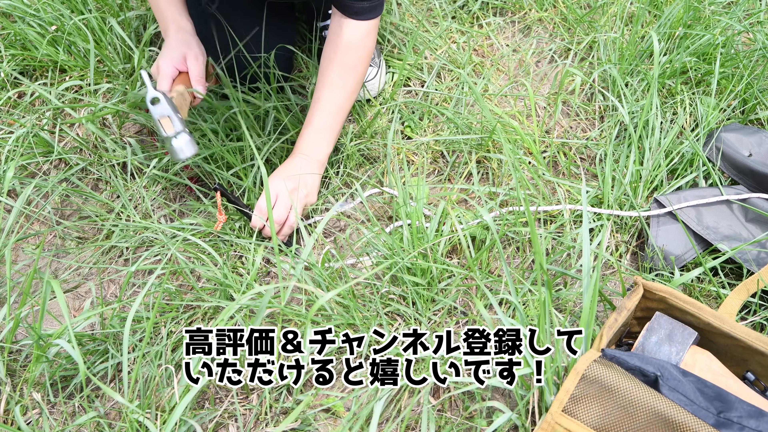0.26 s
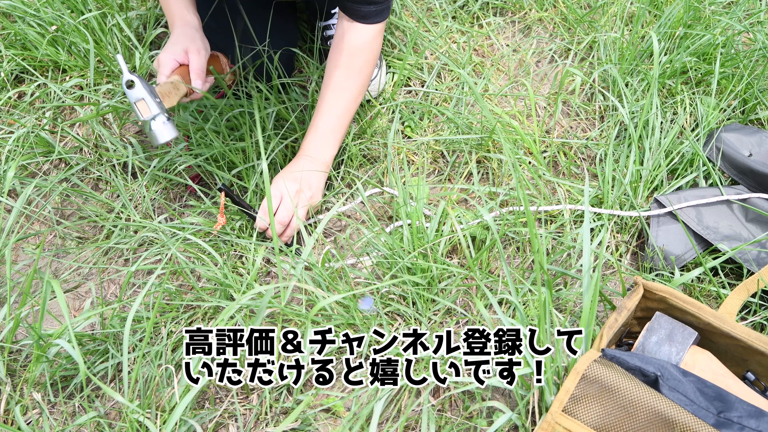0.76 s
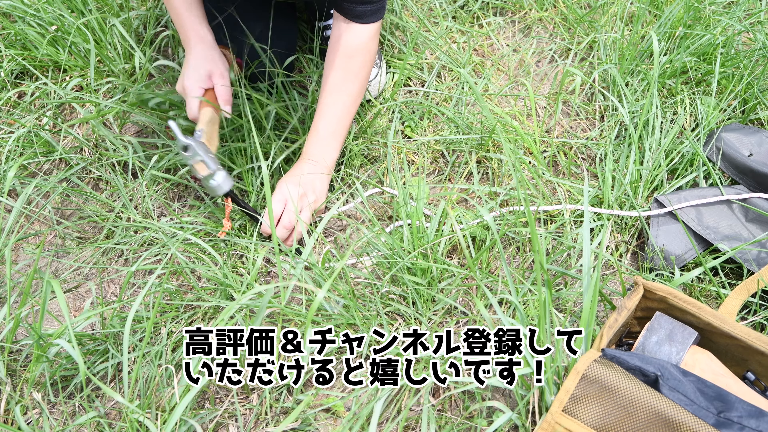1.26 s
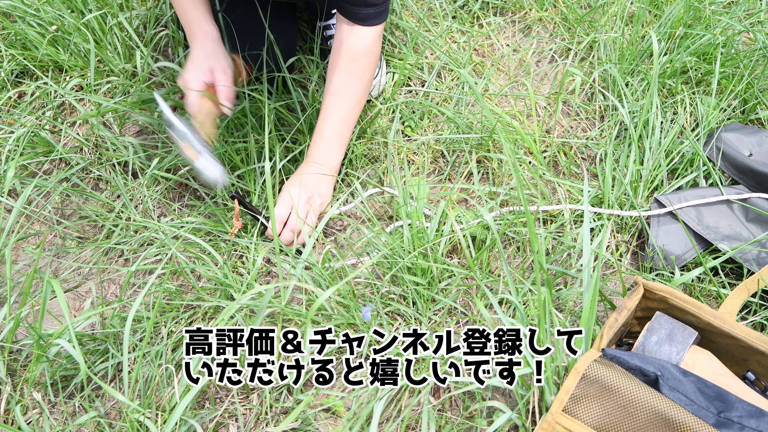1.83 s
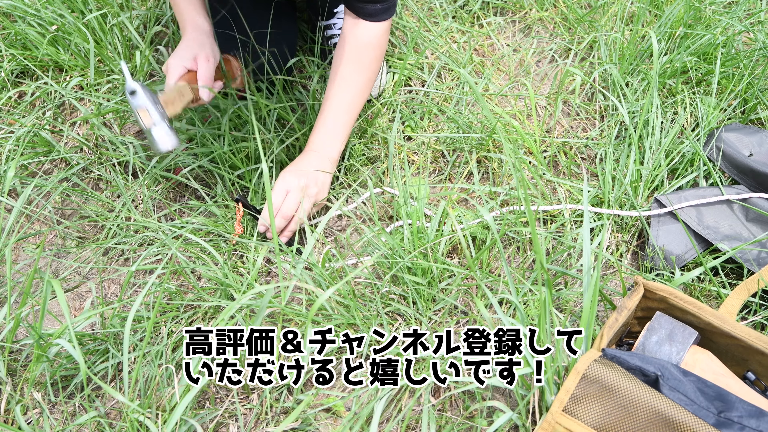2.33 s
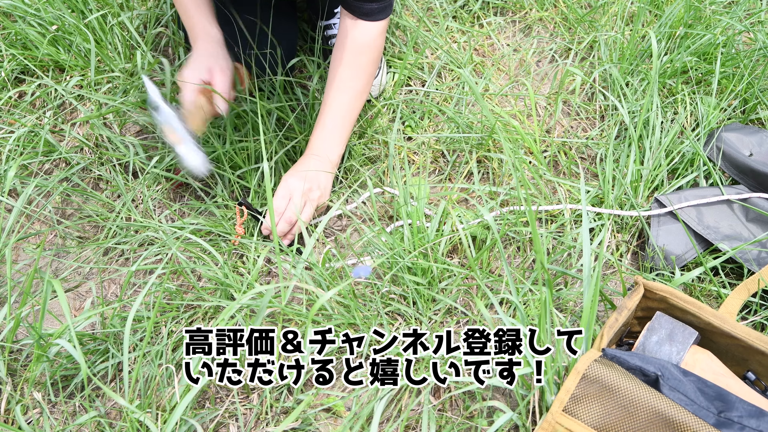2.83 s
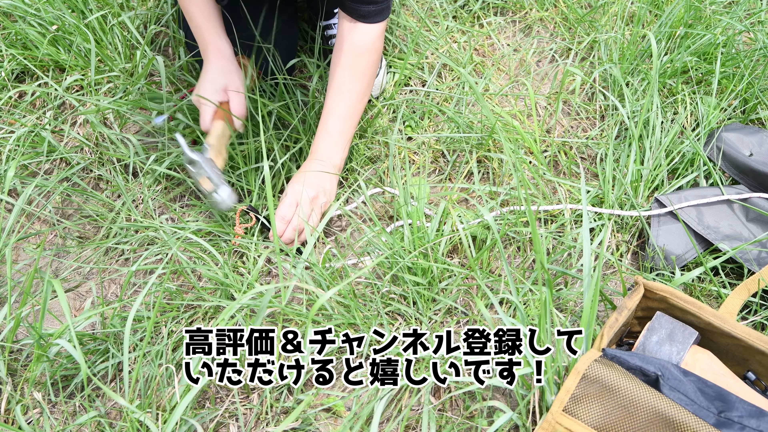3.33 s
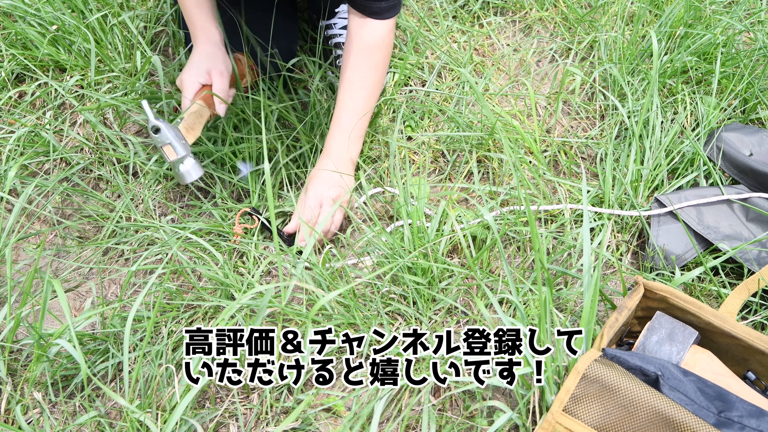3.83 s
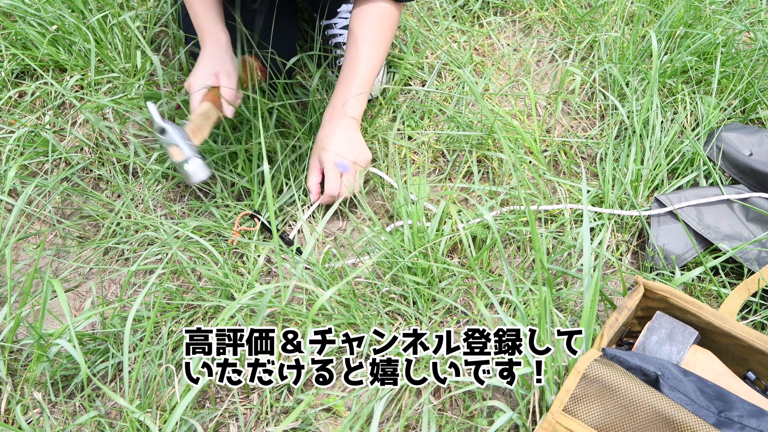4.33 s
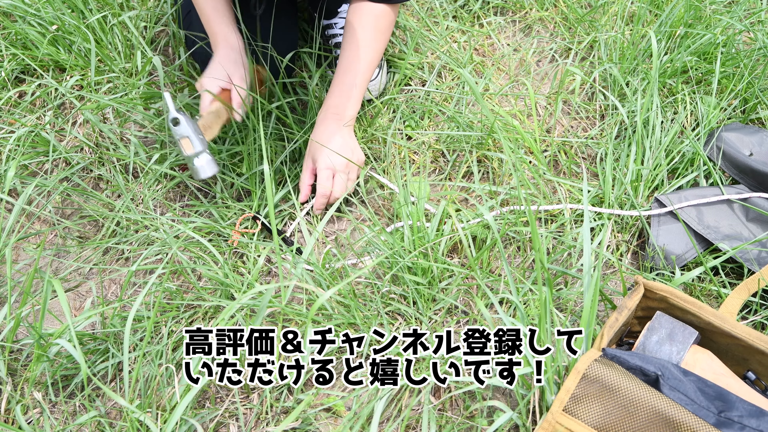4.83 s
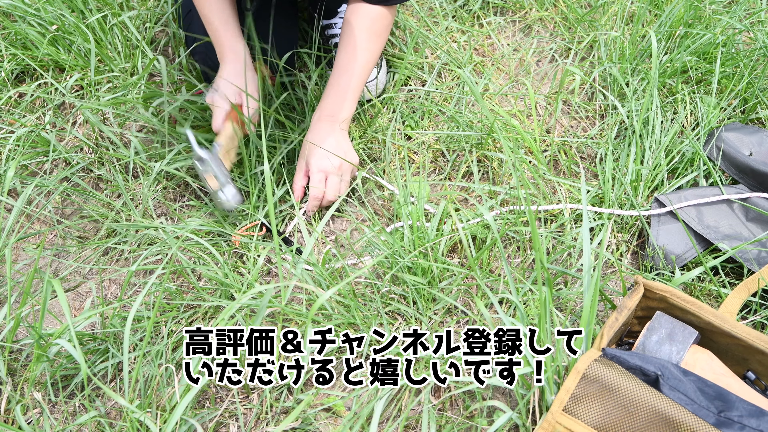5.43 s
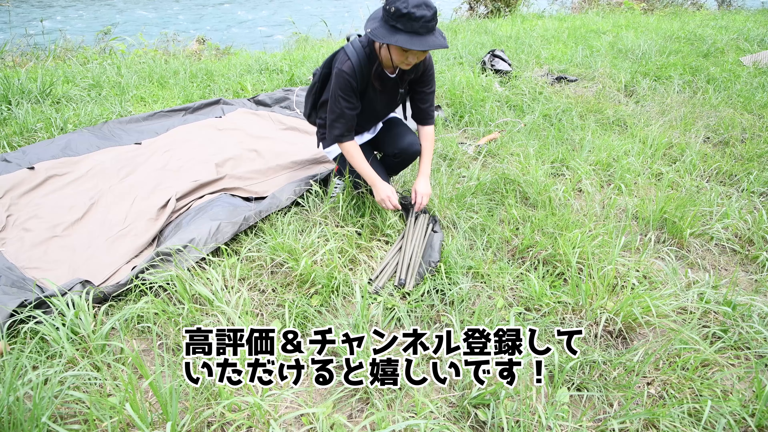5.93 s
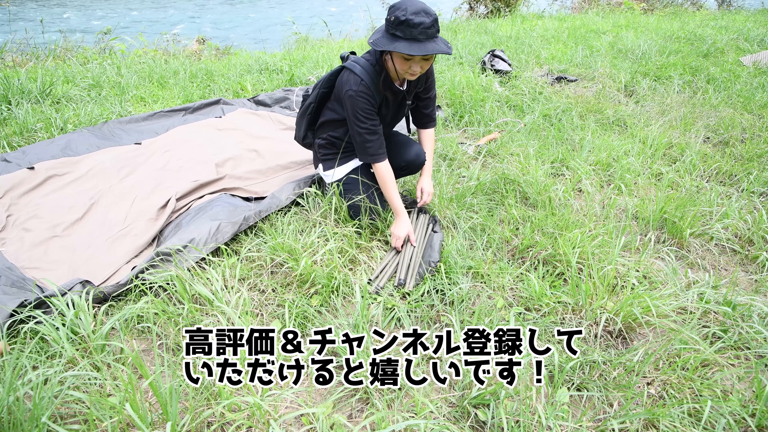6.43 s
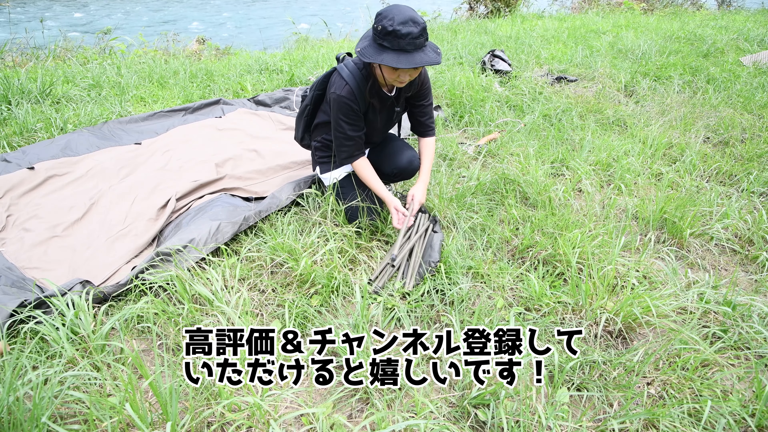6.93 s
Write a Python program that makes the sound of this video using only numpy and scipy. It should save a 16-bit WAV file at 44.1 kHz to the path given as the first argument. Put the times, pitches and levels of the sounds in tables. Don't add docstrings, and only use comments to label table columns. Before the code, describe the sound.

Quiet riverbank air opens the scene: smooth water hiss, a faint low generator hum and a thin high insect blur. From 0.66 s a small hammer taps a steel peg, the first blow weaker, then blows at about 1.0, 1.4, 1.7 and 2.0 s. Each is loud, close, dry and bright, a crack with milliseconds of ring and grassy grit, often followed by a tiny rebound. After a short pause and a faint grass brush, firmer taps come at 2.6, 3.0, 3.3 and 3.7 s. Another pause, then five from 4.3 to 5.8 s, some brighter, with more handle knock and soft soil thumps. At 6.0 s the ambience cuts to a wider spot: low rumble gives way to a beating motor drone, insects slightly louder, a soft brush near 6.2 s. Bundled poles clack softly at 6.66 s, then more strongly in a quick double at 6.97 s.

```python
import sys
import numpy as np
from scipy import signal
from scipy.fft import rfft, irfft, next_fast_len
from scipy.io import wavfile
from scipy.ndimage import uniform_filter1d

SR = 44100
rng = np.random.default_rng(int(sys.argv[2]) if len(sys.argv) > 2 else 0)


def persist_wave(psi):
    counts = np.round(np.clip(psi, -1, 1) * 32767).astype(np.int16)
    wavfile.write(sys.argv[1], SR, np.atleast_2d(counts).T)


def ratio_of_db(decibels):
    return 10 ** (np.asarray(decibels, float) / 20)


N = 316364
CLOCK = np.arange(N) / SR
CHANGE_S = 6.0

# start in seconds, strength in dB, pitch of the peg in Hz,
# brightness above that pitch in dB per octave, delay of the second touch in ms.
BLOWS = [(0.6602, -9, 6840, 0, 0.18), (1.0277, -1.8, 6540, -2, 0.61), (1.3564, 2.5, 6770, 0, 0.18),
         (1.6631, 1.4, 6840, 0, 0.69), (1.983, 1.2, 7740, -2.8, 0.33), (2.6324, -.2, 7560, 6, 0.28),
         (3.0008, -0.1, 7280, 0, 0.36), (3.3474, 0.1, 6900, 2.5, 0.36), (3.6923, 1.6, 8740, -2.5, 0.4),
         (4.2712, -1.3, 8600, 9.5, .345), (4.6423, -0.7, 6690, 3.5, 0.24), (5.033, 0, 8930, 8, 0.29),
         (5.4062, 0.8, 6720, 1.7, 0.25), (5.7833, 0.5, 9330, -4.5, 0.29)]
# start in seconds, level in dB.
BOUNCES = [(1.0484, -57), (1.373, -49), (1.6934, -47), (2.0044, -48), (2.649, -45), (3.3718, -44),
           (3.719, -39.5), (4.2854, -51), (4.6704, -45), (5.051, -41), (5.4226, -47), (5.803, -44)]
# start in seconds, handle knock in dB,
# left minus right in dB.
BOUTS = [
    (0, -2, 2.0),
    (2.3, 1, 3.6),
    (4.0, 4, 1.2),
]
# low, middle and main peg ring, two high head rings,
# two weaker rings, all in Hz.
RINGS_HZ = [
    (3350, 4790, 7000, 10730, 14880, 5640, 11810),
    (3730, 5720, 7200, 10150, 15580, 6580, 13300),
    (3480, 4450, 8000, 10130, 14360, 5930, 11600),
]
RINGS_DB = [
    (2.8, 7, 11.9, 5.7, 1, 1.5, .6),
    (4.4, 13.6, 15.4, 8, 9.1, 9.5, 2.4),
    (-0.5, 6.8, 10.3, 9.4, -0.5, 5.3, 6.1),
]
RING_T60_S = (.0052, .0031, .0037, .0042, .0045, .0037, .0043)
PORT_LEAD_RAD = (.25, .35, .45, .7, 1.1, .4, .9)
FOLLOW = (.17, .69, 1, 0, 0, 0, .13)
# delay in ms, level in dB.
ECHOES = [
    (.33, -3),
    (.6, -15),
]
# centre of the lobe in seconds, level in dB, length in ms, push 1 or pull -1.
THUDS = [(3.704, -45, 2.9, 1), (4.28, -45, 3, 1), (4.471, -42.5, 2.4, -1), (4.651, -45.5, 2.1, 1),
         (4.812, -40.5, 2.2, 1), (5.044, -49, 3, 1), (5.417, -48, 4, 1), (5.794, -46, 3, 1)]
# start in seconds, level in dB, brightness in dB.
CLACKS = [
    (6.6571, -38, -14),
    (6.9642, -33, -27),
    (6.99, -32.5, -11),
]
# pitch in Hz, level in dB, decay by 60 dB in seconds.
POLE_MODES = [(1450, 5, 0.024), (1724, -9, 0.11), (2224, -11.5, 0.14), (2870, -8.5, 0.057),
              (3704, -13, 0.081), (4360, -13.5, 0.11), (5100, -9.5, 0.047)]
# time in seconds, second order in dB, rumble in dB.
MOTOR = [
    (6.0, -59, -54.5),
    (6.35, -54, -52.5),
    (6.62, -52.5, -59),
    (6.9, -52, -73),
    (7.17, -56, -71),
]
# peak in seconds, level in dB, rise in seconds, fade in dB per second.
RUSTLE = [
    (2.67, -63, .004, 150),
    (6.2, -66, .15, 55),
]
# frequency in Hz, level in dB.
NEAR = [(25, -18), (40, -9), (100, -7.5), (210, -8.5), (320, -9.5), (420, -10.5), (850, -15.5),
        (1150, -13.5), (2200, -18.5), (3000, -23), (4600, -31), (7500, -25), (10700, -35), (15900, -33.5)]
# frequency in Hz, level in dB.
WIDE = [(25, -12), (86, -1), (150, -9), (300, -8), (400, -9), (650, -13.5), (1950, -16.5), (3000, -22.5),
        (5200, -31.5), (7800, -23), (9900, -31.5), (15900, -31.5)]
# frequency in Hz, level in dB.
PORT_SPREAD = [(60, -70), (110, -59), (200, -61), (380, -35.5), (700, -17), (1290, -10.5), (2380, -4.5),
               (4400, 1.5), (8120, 3.5), (15000, -1)]
# frequency in Hz, level in dB.
LEAN = [(60, 0.0), (110, 0.0), (200, 0.0), (380, 0.0), (700, -0.5), (1290, -2.0), (2380, -1), (4400, -1),
        (8120, -3.5), (15000, -2.5)]


def unit(x):
    return x / np.sqrt(np.mean(x ** 2))


def fall(t, t60):
    return np.exp(-np.log(1000) * t / t60)


def filtered(design, x):
    return signal.sosfilt(design, x)


def colour(x, points):
    size = next_fast_len(N)
    hz, db = np.transpose(points)
    bins_hz = np.arange(size // 2 + 1) * SR / size
    gain = ratio_of_db(np.interp(np.log(bins_hz + 1), np.log(hz), db))
    return irfft(rfft(x, size) * gain, size)[..., :N]


def band(lo_hz, hi_hz, channels=1):
    edges = signal.butter(2, [lo_hz, hi_hz], "band", fs=SR, output="sos")
    return unit(filtered(edges, rng.standard_normal((channels, N))))


def curve(s, db):
    return ratio_of_db(np.interp(CLOCK, s, db, -120, -120))


def ring(hz, db, t60, phase, size=1300):
    t = np.arange(size) / SR
    decay = fall(t, np.maximum(t60, 1e-3)[:, None])
    return ratio_of_db(db)[:, None] * decay * np.sin(2 * np.pi * hz[:, None] * t + phase[:, None])


def add(out, s, sound):
    i = int(s * SR)
    out[:, i:i + sound.shape[-1]] += sound[..., :N - i]


def steel_rings(hz, db, pan_db, chance):
    start = .12 * chance[:7]
    hz, level_db, t60 = np.array(hz), np.array(db) - 22.5, np.array(RING_T60_S)
    lead = np.array(PORT_LEAD_RAD)
    left = ring(hz, level_db, t60, start + .5 * lead, size=900)
    right = ring(hz, level_db, t60, start - .5 * lead, size=900)
    lean_db = pan_db * np.array([.05, 0.5, 0.5, 0.6, 1.5, 0.5, 0.9])
    return np.array([ratio_of_db(lean_db / 2) @ left, ratio_of_db(-lean_db / 2) @ right])


def crack():
    click = np.zeros(900)
    click[0] = 1
    for ms, echo_db in ECHOES:
        click[int(ms * SR / 1000)] = ratio_of_db(echo_db)
    return filtered(signal.butter(3, 11500, fs=SR, output="sos"), click)


def grit(chance):
    t = np.arange(900) / SR
    noise = chance[20:920] + 0.13 * np.array([chance[920:], -chance[920:]])
    tail = ratio_of_db(-22) * fall(t, 0.0056) + ratio_of_db(-32.5) * fall(t, 0.032)
    return noise * tail * (t > .0007)


def handle_knock():
    hz, db = np.array([442.0, 1090.0, 1390.0, 1760.0]), np.array([-4.5, 5.0, 3.0, -22.0])
    t60 = np.array([0.042, 0.0092, 0.024, 0.0071])
    return ring(hz, db, t60, np.zeros(4), size=900).sum(0)


def tick(hz, db, knock_db, pan_db, chance):
    impact_db = np.mean(db) - 10.0 + pan_db * np.array([[.3], [-.3]])
    impact = ratio_of_db(impact_db) * (crack() + ratio_of_db(1.5) * grit(chance))
    sound = steel_rings(hz, db, pan_db, chance) - impact
    thin = filtered(signal.butter(5, 2400, "high", fs=SR, output="sos"), sound)
    return thin + ratio_of_db(knock_db - 49.0) * handle_knock()


def hammer():
    touch_db, scatter_db, pan_per_db = -7.6, .6, .08
    out = np.zeros((2, N))
    chance = rng.standard_normal((len(BLOWS), 1820))
    for (s, db, peg_hz, bright_db, touch_ms), luck in zip(BLOWS, chance):
        bout = np.searchsorted(np.transpose(BOUTS)[0], s) - 1
        _, knock_db, pan_db = BOUTS[bout]
        usual = np.array(RINGS_HZ[bout])
        hz = usual * (peg_hz / usual[2]) ** np.array(FOLLOW)
        octaves_above = np.maximum(np.log2(hz / peg_hz), 0)
        ring_db = db + np.array(RINGS_DB[bout]) + bright_db * octaves_above + scatter_db * luck[7:14]
        blow = tick(hz, ring_db - 0.5, knock_db, pan_db + pan_per_db * db, luck)
        lag = touch_ms * SR / 1000
        second = np.roll(blow, int(lag), axis=1) * (np.arange(900) > lag - 1)
        add(out, s - .0001, blow + ratio_of_db(touch_db) * second)
    chance = rng.standard_normal((len(BOUNCES), 1820))
    for (s, level_db), luck in zip(BOUNCES, chance):
        bounce = tick(RINGS_HZ[-1], [2.7, 2.3, 2.8, 4.6, 1, 2.4, 3], -10, .4, luck)
        add(out, s + 0.0016, ratio_of_db(level_db + 20) * bounce)
    return out


def soil():
    out = np.zeros((2, N))
    t = np.arange(-800, 800) / SR
    for s, db, ms, way in THUDS:
        u = t / (ms / 1000)
        lobe = (1 - u ** 2) * np.exp(-u ** 2 / 2)
        add(out, s - 800 / SR, np.sign(way) * ratio_of_db(db) * lobe)
    return out


def poles():
    out = np.zeros((2, N))
    hz, mode_db, t60 = np.transpose(POLE_MODES)
    chance = rng.standard_normal((len(CLACKS), 3, 10))
    for (s, db, bright_db), luck in zip(CLACKS, chance):
        for lag_s, touch_db, row in zip((0, .004, .011), (0, -5, -9), luck):
            detuned = hz * (1 + 0.021 * row[:len(hz)])
            tilted_db = mode_db + (hz > 3000) * (bright_db + 13)
            rings = ring(detuned, tilted_db, .5 * t60, 2 * row[::-1][:len(hz)])
            soft = np.minimum(np.arange(rings.shape[1]) / (0.00044 * SR), 1)
            scrape = uniform_filter1d(rng.standard_normal(400), size=2)
            rings[0, :400] += ratio_of_db(-6) * scrape * np.exp(-np.arange(400) / 170)
            pan = ratio_of_db(db + touch_db - 7 + np.array([[.3], [-.3]]))
            add(out, s + lag_s, pan * rings.sum(0) * soft)
    return out


def rustle():
    grains = ratio_of_db(3.0 * unit(uniform_filter1d(rng.standard_normal(N), 60)))
    brush = np.zeros(N)
    for s, db, rise_s, fade_db in RUSTLE:
        since = CLOCK - s
        brush += ratio_of_db(db - fade_db * np.maximum(since, 0)) * np.clip(1 + since / rise_s, 0, 1)
    return band(8900, 15000, channels=2) * grains * brush


def engines():
    wobble = unit(uniform_filter1d(rng.standard_normal(N), 3000))
    swell = unit(uniform_filter1d(uniform_filter1d(rng.standard_normal(N), size=12000), size=12000))
    hum_phase = 2 * np.pi * np.cumsum(76.8 + 1.83 * wobble) / SR
    hum = np.sqrt(2) * np.sin(hum_phase) * ratio_of_db(-60 + 1.3 * swell - 2.5)
    motor_hz, beat_hz, beat_peak_s, beat_depth = 195.6, 3.6, 6.635, .9
    beat = 1 - beat_depth * np.sin(np.pi * beat_hz * (CLOCK - beat_peak_s)) ** 2
    s, order_db, rumble_db = np.transpose(MOTOR)
    order = np.sqrt(2) * np.sin(2 * np.pi * motor_hz * CLOCK) * beat * curve(s, order_db)
    rumble = band(77, 133) * curve(s, rumble_db) * ratio_of_db(-5.0)
    return hum + order + rumble


def insects():
    before = CLOCK < CHANGE_S
    chorus_hz, chorus_db = np.where(before, 8430, 7900), np.where(before, -64.5, -62.5)
    slow = filtered(signal.butter(2, 700, fs=SR, output="sos"), rng.standard_normal((2, 2, N)))
    phase = 2 * np.pi * np.cumsum(chorus_hz) / SR
    return ratio_of_db(chorus_db + 5.5) * unit(slow[0] * np.cos(phase) + slow[1] * np.sin(phase))


def river():
    mid, side = rng.standard_normal((2, N))
    side = colour(side, PORT_SPREAD)
    left = colour(mid + side, [(hz, db / 2) for hz, db in LEAN])
    right = colour(mid - side, [(hz, -db / 2) for hz, db in LEAN])
    top_cut = signal.ellip(10, .2, 60, 15760, fs=SR, output="sos")
    pair = filtered(top_cut, np.array([left, right]))
    near, wide = unit(colour(pair, NEAR)), unit(colour(pair, WIDE))
    return np.where(CLOCK < CHANGE_S, ratio_of_db(-52.5) * near, ratio_of_db(-51.5) * wide)


def scene():
    return hammer() + soil() + poles() + rustle() + engines() + insects() + river()


def band_limit(x):
    return signal.sosfilt(signal.butter(12, 17340, fs=SR, output="sos"), x)


def record(dry):
    top_cut = signal.ellip(5, .3, 45, 16150, fs=SR, output="sos")
    mix = np.clip(signal.sosfiltfilt(top_cut, dry), -1, 1)
    return band_limit(mix)


dry = scene()
out = record(dry)
persist_wave(out)
```